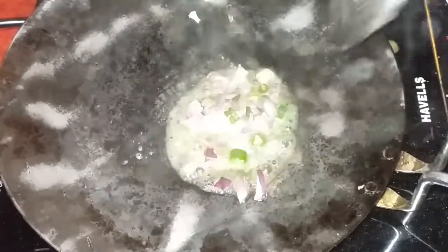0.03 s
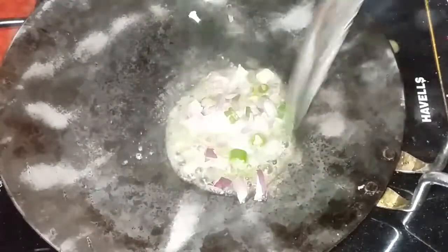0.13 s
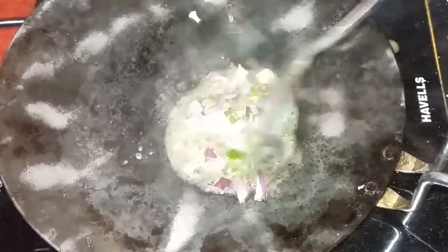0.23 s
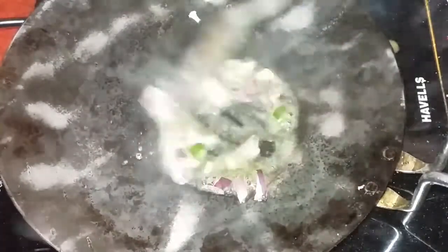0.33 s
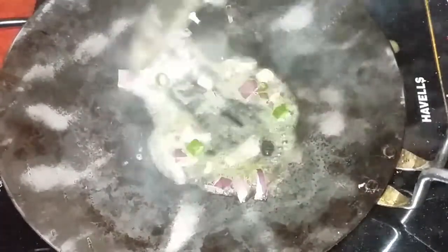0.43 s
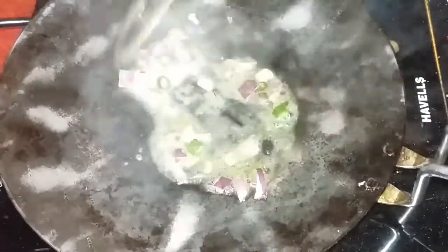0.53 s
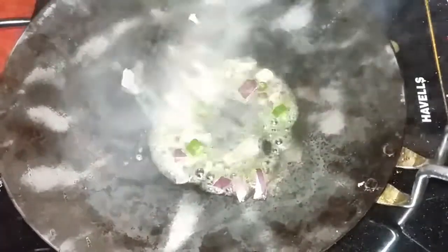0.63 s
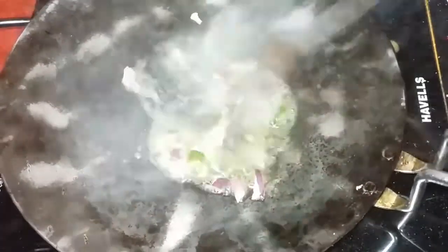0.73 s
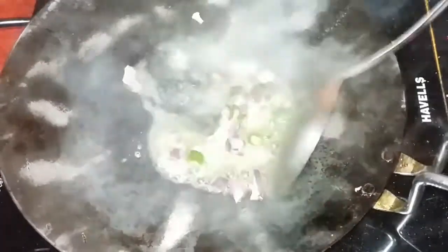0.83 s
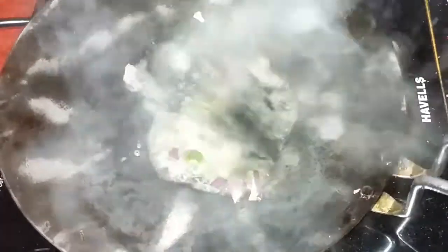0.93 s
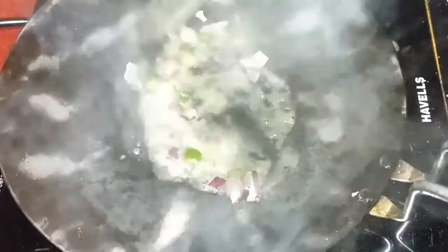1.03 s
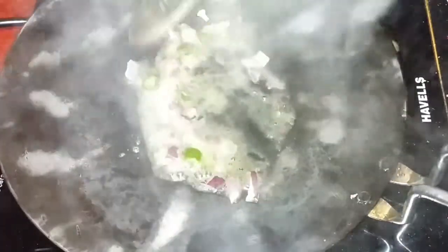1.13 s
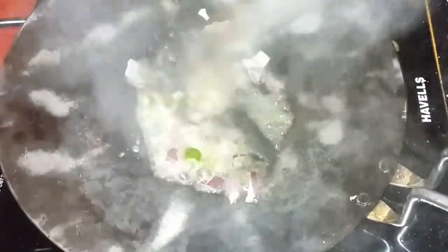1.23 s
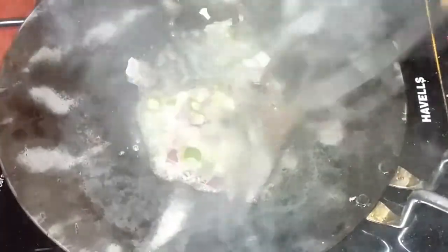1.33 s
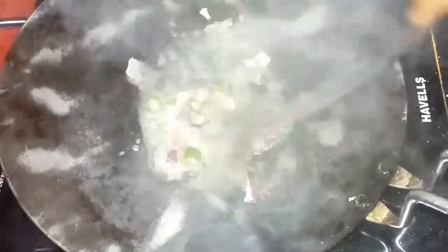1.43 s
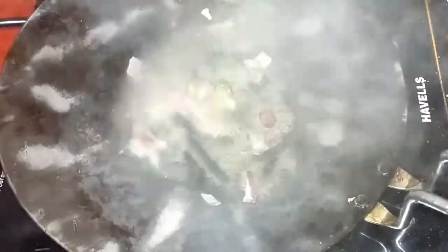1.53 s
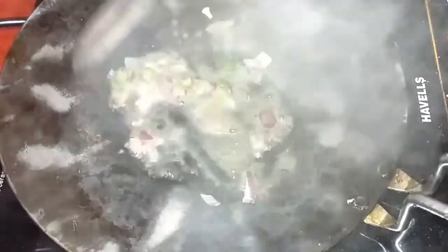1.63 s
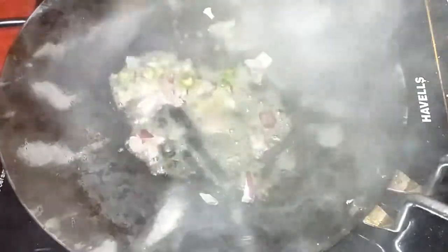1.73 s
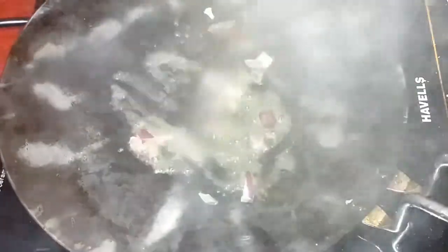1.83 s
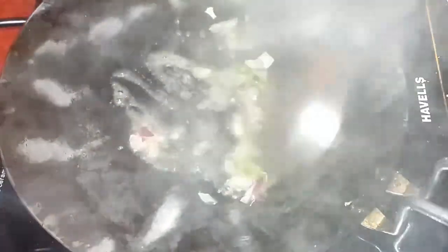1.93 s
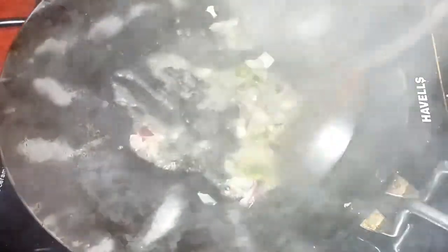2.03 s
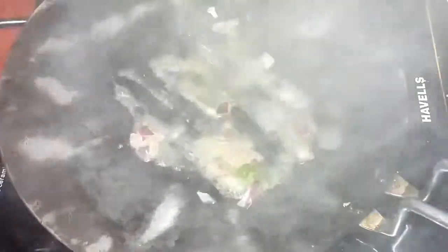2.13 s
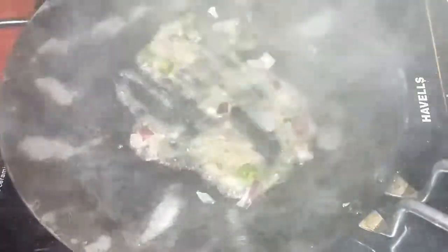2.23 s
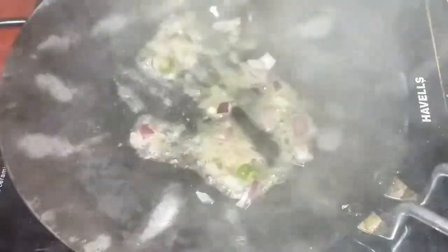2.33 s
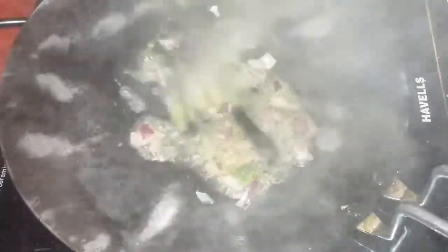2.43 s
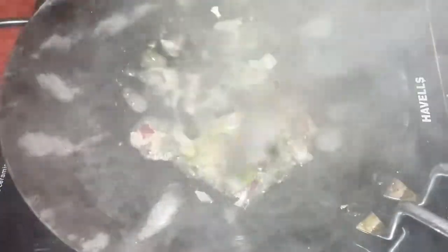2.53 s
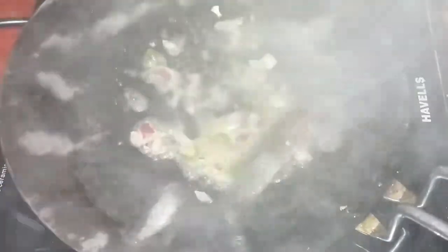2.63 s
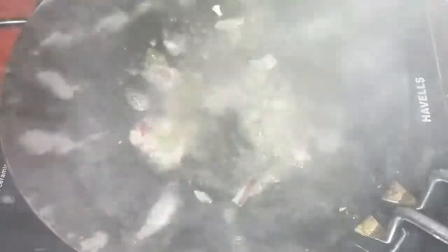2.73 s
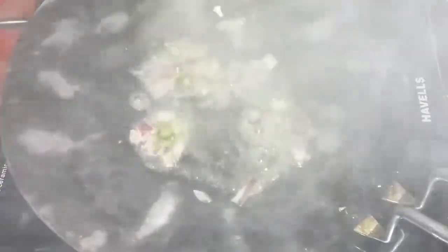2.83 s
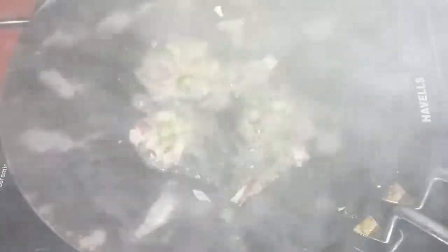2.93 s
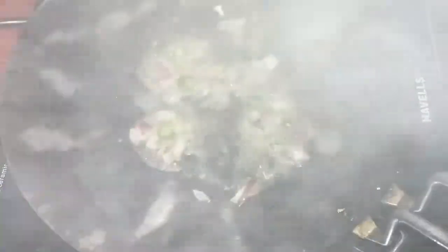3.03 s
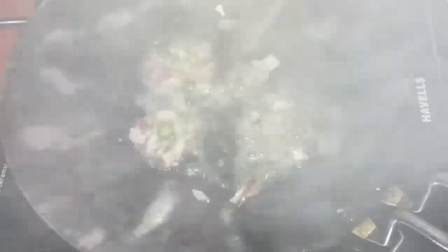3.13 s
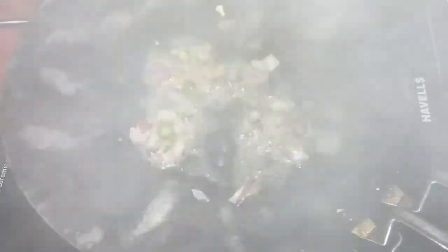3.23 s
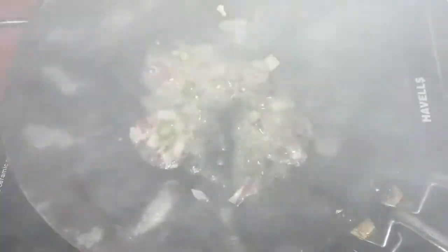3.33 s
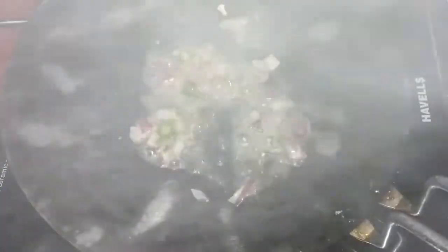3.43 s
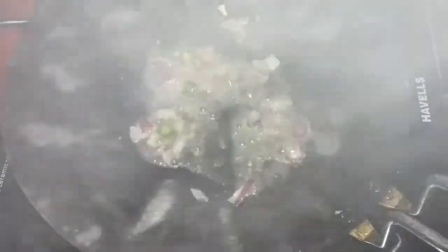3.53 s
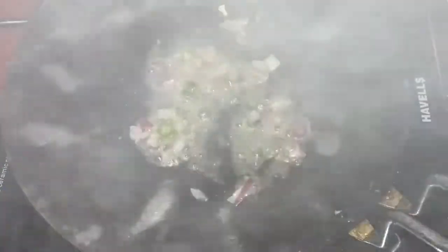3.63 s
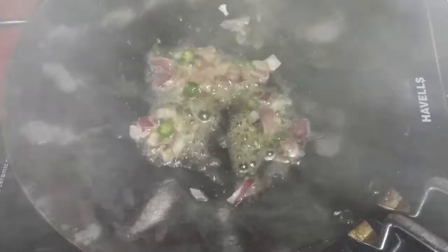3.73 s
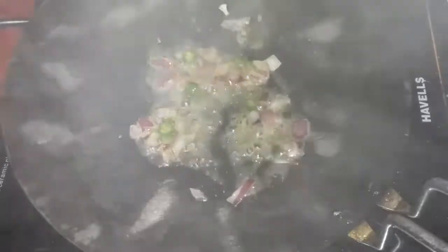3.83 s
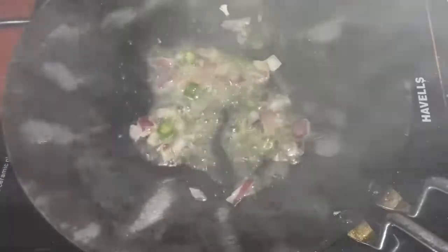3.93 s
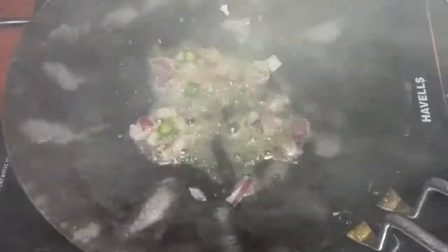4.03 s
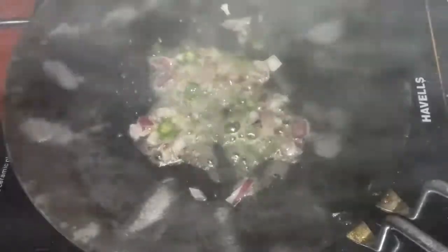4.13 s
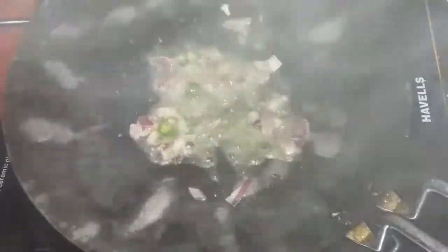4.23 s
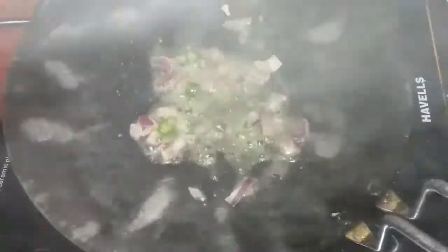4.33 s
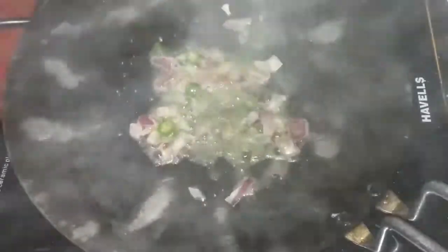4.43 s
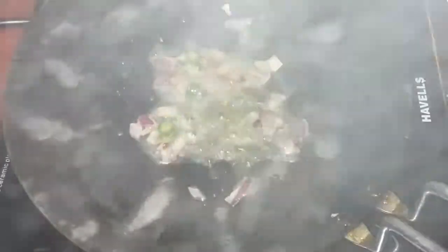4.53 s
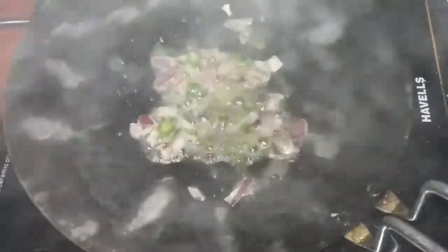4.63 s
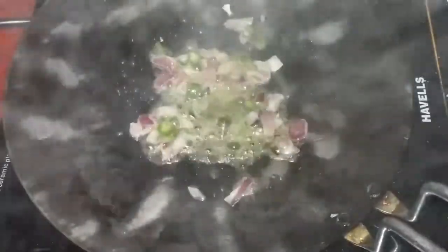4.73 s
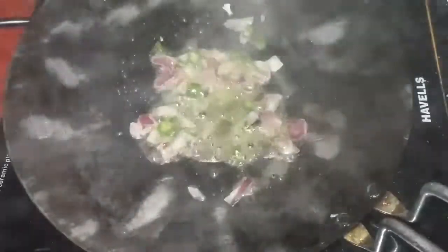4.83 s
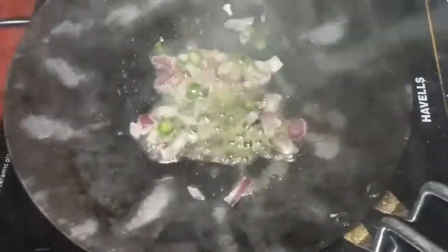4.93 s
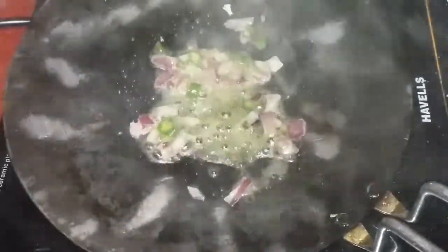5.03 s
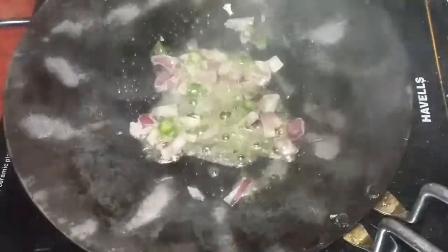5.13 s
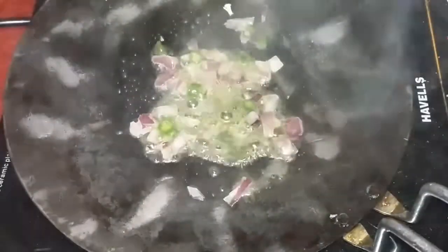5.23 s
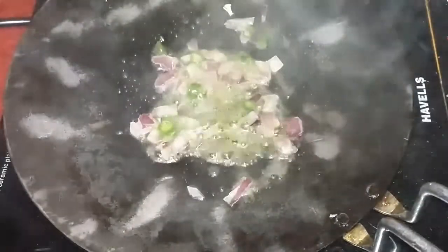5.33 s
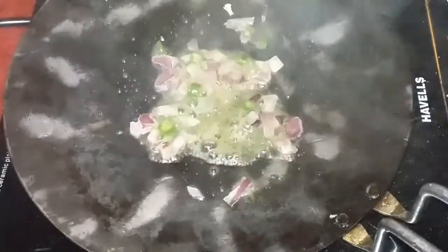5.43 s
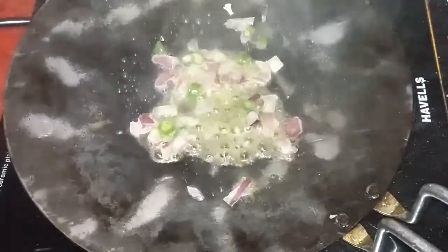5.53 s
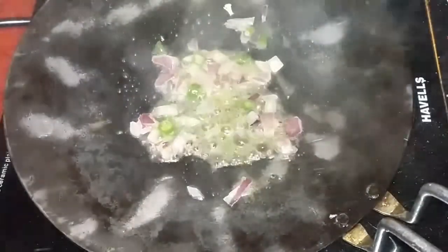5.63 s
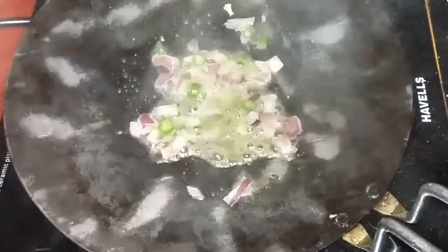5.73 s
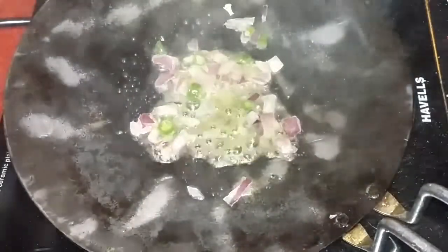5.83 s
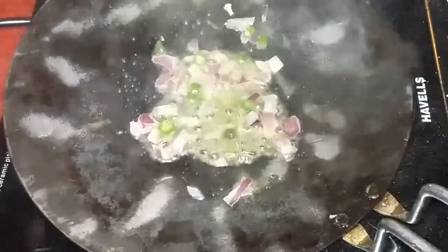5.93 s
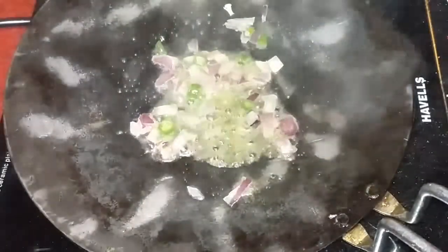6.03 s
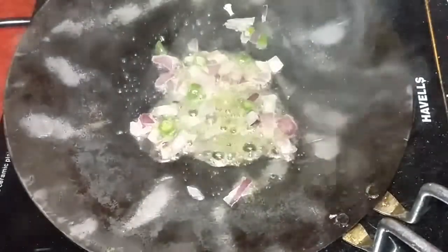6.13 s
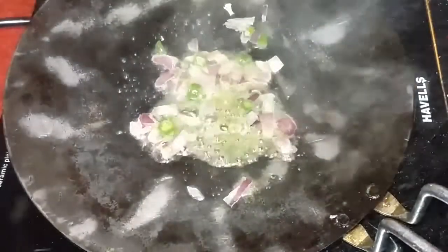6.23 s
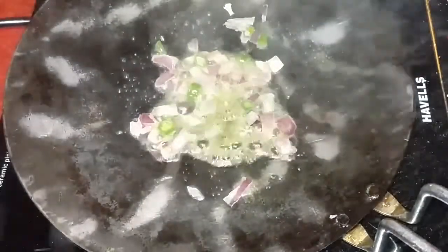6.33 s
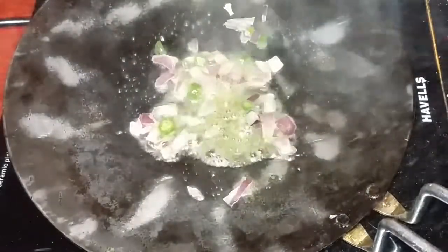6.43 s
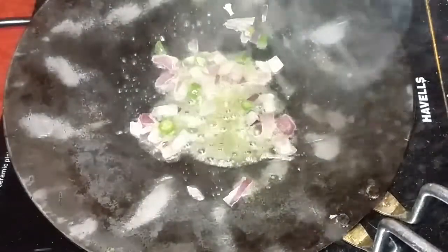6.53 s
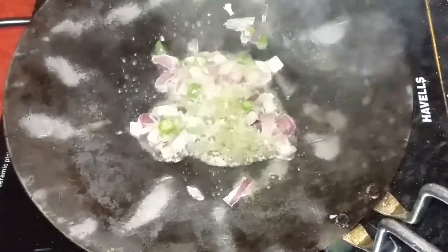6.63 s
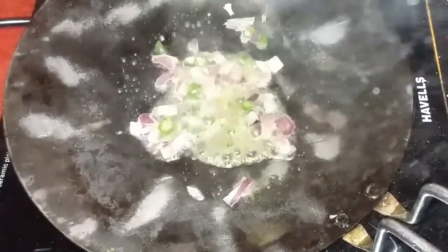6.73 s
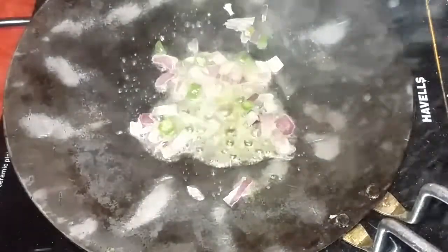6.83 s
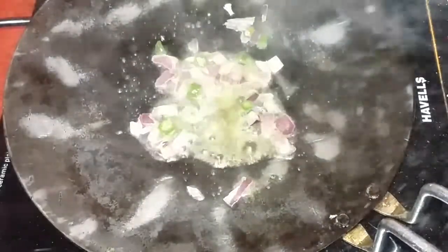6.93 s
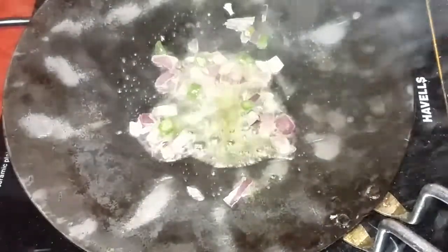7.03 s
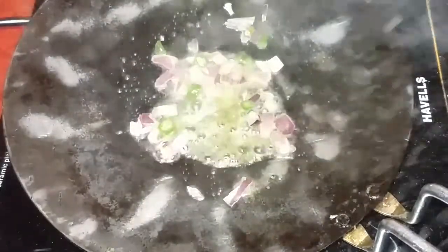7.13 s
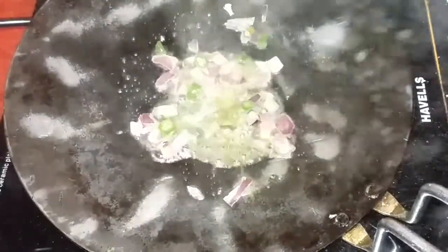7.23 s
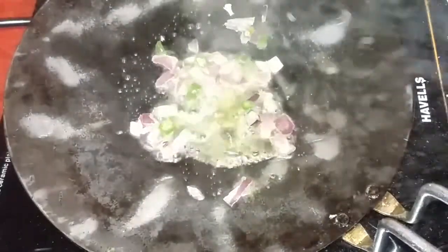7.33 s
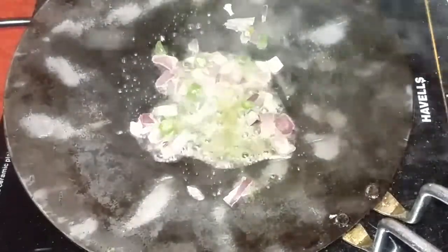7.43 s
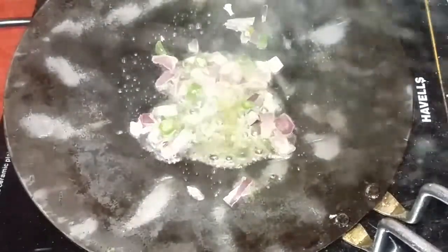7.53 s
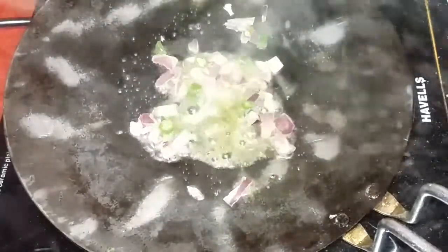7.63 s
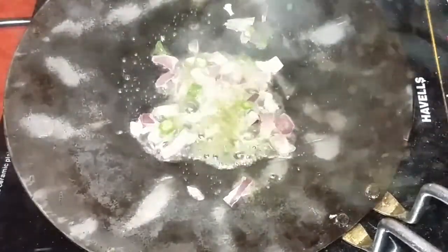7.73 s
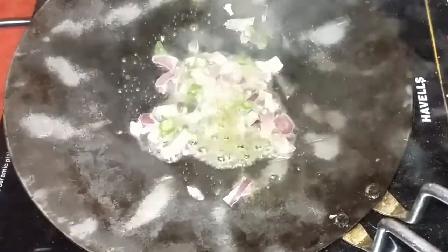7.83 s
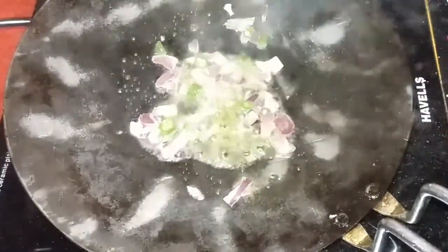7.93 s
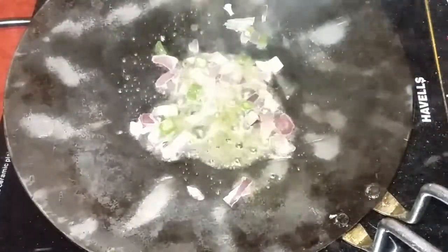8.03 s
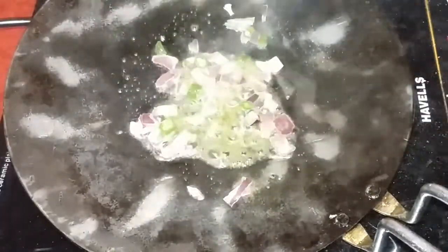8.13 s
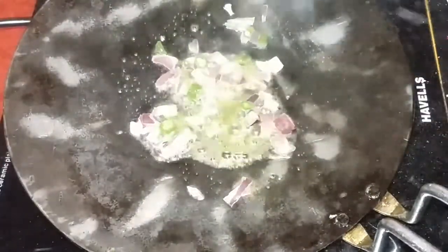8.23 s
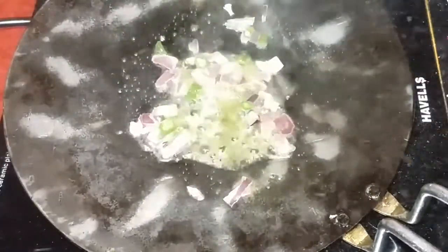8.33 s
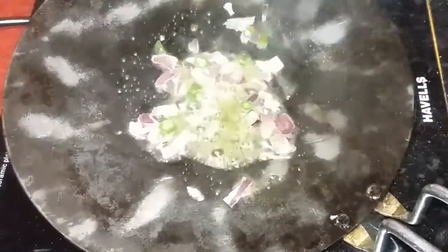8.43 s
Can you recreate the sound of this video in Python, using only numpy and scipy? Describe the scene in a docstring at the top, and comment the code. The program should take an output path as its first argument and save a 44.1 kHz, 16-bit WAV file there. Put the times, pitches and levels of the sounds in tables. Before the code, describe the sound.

Close, bright frying hiss flares under five sharp metal spoon clacks, dips briefly, then crackles and slowly calms over a faint fan hum.

```python
"""In a kitchen, chopped onion and chilli fry in butter on a flat iron pan; the induction hob's fan hums.
The sizzle is made of tiny random clicks, bubbles that ring, and a few snapping spits of fat.
A steel spoon knocks and drags over the pan five times, ringing both; the spread butter flares up.
The whole sound sinks for a second, then returns, and the sizzle slowly settles."""
import sys
import numpy as np
from scipy import signal
from scipy.fft import rfft, irfft, next_fast_len
from scipy.io import wavfile
from scipy.ndimage import uniform_filter1d, minimum_filter1d, map_coordinates

SR = 44100
rng = np.random.default_rng(int(sys.argv[2]) if len(sys.argv) > 2 else 0)


def master_out(mix):
    """Clip the mix to full scale and print it as 16-bit PCM to the path in sys.argv[1]."""
    frames = np.transpose(np.atleast_2d(mix))
    ceiling = np.clip(frames, -1, 1)
    pcm = np.round(ceiling * 32767).astype(np.int16)
    wavfile.write(sys.argv[1], SR, pcm)


N = 374850
TIME = np.arange(N) / SR   # seconds
CUTOFF_HZ = 15680          # hardly anything is heard above this

# The rush of air through the hob: f/Hz, relative level/dB
FAN_AIR_COLOUR = [(25, -35), (45, -23), (65, -16.5), (100, -8.5), (150, -9.5), (200, -5.5), (360, -1.5),
                  (425, 7), (490, 4), (600, 0.5), (1150, 0), (1500, -7), (2500, -21), (6000, -50)]
# Tones of the seven blades and the motor's poles: multiple of the turning rate, relative level/dB
FAN_TONES = [(7, -15.5), (8, -16.5), (12, -8), (14, -19.5), (16, -17), (20, -14), (21, -13), (28, -2.5)]
FAN_TURNS_HZ, FAN_DB = 39.37, -41

# Spoon strokes: t/s, spoon level/dB, pan level/dB, place (0 middle to 1 rim), clack level/dB,
# drag level/dB, drag length/s, drag fading time/s
SPOON_STROKES = [(0.585, -17.5, -25, 0.39, -15, -27.5, 0.1, 0.27),
                 (0.896, -27, -16, 0.95, -13, -30.5, 0.05, .15),
                 (1.1438, -16, -28, 0.65, -9, -29, 0.075, 0.076),
                 (1.4272, -24, -15, 0, -7.5, -32.5, 0.11, .08),
                 (1.7862, -13.5, -21.5, 0.23, -0.5, -22.5, 0.1, 0.061)]
# The spoon bowl; its evenly spaced strong tones beat into a short buzz:
# f/Hz, relative level/dB, time to fade by 60 dB/s
SPOON_TONES = [(2284, -2, .14), (2430, -11, .07), (2579, 0, .14), (2695, -3, .11), (2869, -2, .13),
               (3012, -12, .1), (3277, -10, .12), (3931, -11, .13), (4510, -11, .1), (4670, -12, .08),
               (5300, -17, .09), (5620, -17, .09), (6700, -17, .09)]
# The brief clack of the spoon held against the iron: f/Hz, relative level/dB, time to fade by 60 dB/s
CLACK_TONES = [(2740, 0, .022), (3350, -12, .012), (4600, -8, .022), (6400, -19, .012)]
# The iron pan: f/Hz, relative level when struck in the middle/dB, the same at the rim/dB,
# time to fade by 60 dB/s
PAN_TONES = [(415, -9, -22, .16), (560, -18, -30, .08), (730, -16, -28, .1), (1104, -7, -12, .17),
             (1472, -25, -2, .5), (1852, -11, 2, .14), (2305, -6, -2, .15), (2780, -3, -7, .09),
             (3350, -12, -13, .1), (3610, -13, -20, .1), (3935, -6, -6, .15), (4640, -11, -11, .11),
             (5523, -6, -19, .13), (6467, -7, -19, .12), (7740, -22, -22, .12)]
# The spoon's edge squeaks as its first drag ends, in the spoon's highest tones
SQUEAK_AT_S, SQUEAK_S, SQUEAK_DB, SQUEAK_ABOVE_HZ = 0.633, 0.048, -29.5, 4950

# The loudest spits of fat: t/s, level/dB, f/Hz, half width/octaves
LOUD_SPITS = [(.13, -28, 4400, 0.4), (3.27, -23, 3600, 0.47), (3.493, -20, 5000, 1.3),
              (3.514, -22, 5200, .15), (3.625, -19.5, 5150, 0.15), (3.706, -15, 7000, 1.7),
              (4.08, -20, 4200, .9), (4.254, -21, 3300, .6), (4.4563, -23.5, 4300, 0.16),
              (4.4735, -21, 12000, .6), (4.618, -23, 5040, .3), (4.873, -20, 3000, 1.2),
              (5.1204, -27, 6600, 0.28), (5.924, -28, 2960, .27), (5.9814, -26, 5140, 0.79),
              (6.218, -25, 6200, 0.19), (6.422, -24, 6740, .11), (6.702, -18, 9000, 1.4),
              (6.71, -21, 4200, 0.41), (7.553, -29, 3600, 0.56)]
# The spray fades more slowly when the pitch is clear; its fading time halves with each such step in width
SPRAY_S, HALVING_OCTAVES = 0.0035, 0.91
# Small spits come at random, with a level that follows the bubbling
SMALL_SPIT_OVER_DB, SMALL_SPIT_SPREAD_DB = 13.5, 2.5
SMALL_SPIT_LOW_HZ, SMALL_SPIT_HIGH_HZ = 2900, 8200
SMALL_SPIT_NARROW, SMALL_SPIT_WIDE = 0.12, 1.04   # half width in octaves

# How hard the butter fries: it leaps when the spoon spreads it, then settles as the water boils off:
# t/s, fizz level before flares/dB
SIMMER = [(0, -44.5), (.355, -40.5), (.445, -31), (2.7, -33), (4.1, -34.5), (5.4, -40.5), (8.5, -46.5)]
# The spoon pushes wet food onto bare hot iron and the sizzle flares: t/s, length of the push/s, rise in fizz
# level/dB, rise in bubbling and murmur level/dB
FLARES = [(.40, 0.23, 4, 6), (1.0, 0.24, 5.5, 6.5), (1.58, 0.13, 2, 3), (2.16, 0.25, 5.5, 1.5)]
FLARE_ATTACK_S, FLARE_RELEASE_S = 0.047, 0.073
# Bubbling and a ringing murmur: level at the usual fizz level, and their share of its simmer swing
USUAL_FIZZ_DB = -33.5
BUBBLING_DB, BUBBLING_FOLLOWS = -40, 0.66
MURMUR_DB, MURMUR_FOLLOWS = -47, 0.82
# Short damped tones under the sizzle: f/Hz, relative level/dB, time to fade by 60 dB/s
MURMUR_TONES = [(2286, 2.5, 0.03), (2545, 5, 0.016), (2710, -3, 0.024)]
# Colour of the bubbling: f/Hz, relative level/dB
BUBBLING_COLOUR = [(60, -30), (900, -4), (1700, -2), (2050, -0.5), (2400, -3), (3300, -2.5), (4000, -1.5),
                   (4700, 1.2), (5900, -3), (6900, -2.5), (8300, -14), (12000, -22)]
# Colour of the fizz: f/Hz, relative level/dB
FIZZ_COLOUR = [(60, -31), (1500, -23), (3500, -4), (6500, -2), (8600, -6), (10500, -2), (12300, -1.5),
               (14200, -3), (15700, -2.2)]

# A near surface mirrors the sizzle as the microphone moves: t/s, extra time on the way/ms
MIRROR_DELAY = [(4.75, 0.45), (5.0, 0.29), (5.4, 0.37), (6.7, .37), (7.15, 0.39), (7.42, 0.486),
                (7.7, 0.36), (8.2, .35)]
MIRROR_FROM_S, MIRROR_FADE_S, MIRROR_SHARE = 4.3, 0.5, 0.19
# The level of the whole sound falls, stays low and comes back, starting at the last knock
DIP_AT_S, DIP_FALL_S, DIP_HOLD_S, DIP_RETURN_S, DIP_DB = 1.785, 0.29, 0.79, 0.32, -7
# Colour difference of the two microphones: f/Hz, left minus right level/dB
MICROPHONE_BALANCE = [(2050, 0), (3400, -3.5), (4700, -8.5), (5800, -10), (7300, -5.5), (8400, 0.5),
                      (9800, 3.5), (12200, 3), (13500, 0.5)]


def from_db(db):
    """Turn decibels into a gain."""
    return 10 ** (np.asarray(db) / 20)


def rms_one(x):
    """Scale a sound to an average strength (rms) of one."""
    return x / np.sqrt(np.mean(x ** 2) + 1e-20)


def in_time(rows):
    """Join the points of a table into one curve over time for each column."""
    t, *columns = np.transpose(rows)
    return [np.interp(TIME, t, column) for column in columns]


def ramp(start_s, length_s):
    """Rise evenly from nothing to one, then stay."""
    return np.clip((TIME - start_s) / length_s, 0, 1)


def filtered(x, kind, edges_hz):
    """Keep only part of the pitch range, with gentle edges."""
    return signal.sosfilt(signal.butter(2, edges_hz, kind, fs=SR, output="sos"), x)


def colour(x, points):
    """Shape a sound by a smooth curve of level against frequency, without shifting it in time."""
    hz, db = np.transpose(points)
    size = next_fast_len(N + SR // 10)
    bins_hz = np.maximum(np.fft.rfftfreq(size, 1 / SR), 1)
    gain = from_db(np.interp(np.log(bins_hz), np.log(hz), db))
    return irfft(rfft(x, size) * gain, size)[:N]


def drift(rate):
    """Wander smoothly by chance, with a spread of one, at about this rate per second."""
    step = 40   # samples between the slow values
    r = np.exp(-2 * np.pi * rate * step / SR)
    noise = rng.standard_normal(N // step + 2002)
    slow = signal.lfilter([1], [1, -2 * r, r * r], noise)[2000:]
    return np.interp(np.arange(N) / step, np.arange(len(slow)), rms_one(slow))


def ring(clicks, hz, t60):
    """Each click sets off a fading tone, of height one for a unit click; a small body gives no bass."""
    r = np.exp(-np.log(1000) / (t60 * SR))
    w = 2 * np.pi * min(hz, SR / 2) / SR
    return signal.lfilter([1, -1], [1, -2 * r * np.cos(w), r * r], clicks + 1e-18)


def bursts(per_s, spread_db, largest):
    """Scatter clicks at random times, most of them small and a few large."""
    sizes = from_db(spread_db * np.minimum(rng.exponential(1, N), largest))
    signs = rng.choice([-1, 1], N)
    return sizes * signs * (rng.random(N) < per_s / SR)


def fan(level_db, speed_wander=0.000884, waver_db=0.5):
    """Air rushes through the hob's vents, with tones locked to the turning of the fan."""
    turns = np.cumsum(FAN_TURNS_HZ * (1 + speed_wander * drift(1.54))) / SR
    tones = np.zeros(N)
    for multiple, db in FAN_TONES:
        phase = 2 * np.pi * (round(multiple) * turns + rng.random())
        tones += from_db(db + waver_db * drift(7.5)) * np.sin(phase)
    air = rms_one(colour(rng.standard_normal(N), FAN_AIR_COLOUR))
    # the root of two gives a sine an rms of one
    return from_db(level_db) * (air + np.sqrt(2) * from_db(-1) * tones)


def kitchen(x, t60=0.13, early_s=0.0032):
    """Worktop and walls answer with a short, blurred echo, made by spreading the sound over fading noise."""
    age = TIME[:SR // 2]
    fade = np.exp(-np.log(1000) * age / t60)
    tail = rng.standard_normal(len(age)) * fade * (age > early_s)
    return signal.fftconvolve(x, tail / np.sqrt(np.sum(tail ** 2)))[:N]


def squeak():
    """Steel slips quickly over bare iron and sets the spoon's highest tones singing."""
    slips = rng.standard_normal(N) * np.sin(np.pi * ramp(SQUEAK_AT_S, SQUEAK_S)) ** 2
    sound = sum(from_db(db) * ring(slips, hz, t60 / 2)
                for hz, db, t60 in SPOON_TONES if hz > SQUEAK_ABOVE_HZ)
    return from_db(SQUEAK_DB) * sound / np.sqrt(np.sum(sound ** 2) / (SQUEAK_S * SR))


def spoon_on_pan(slips_per_s=600, pressed_damping=2.45, thud_db=-7, thud_s=0.059, travel_s=0.004):
    """Each stroke lands, so that spoon and pan ring, then drags over the iron in tiny slips."""
    out, age = np.zeros(N), TIME[:SR]
    landing = (age == 0) * 1.0
    for t, spoon_db, pan_db, place, clack_db, drag_db, drag_s, drag_fade_s in SPOON_STROKES:
        slips = rng.choice([-1, 1], len(age)) * (rng.random(len(age)) < slips_per_s / SR)
        push = np.sqrt(np.sin(np.pi * np.minimum(age / drag_s, 1)))
        drag = from_db(drag_db) * slips * np.exp(-age / drag_fade_s) * push
        sound = np.zeros(len(age))
        for hz, db, t60 in SPOON_TONES:
            knock = from_db(spoon_db) * ring(landing, hz, t60)
            # pressed onto the iron, the spoon rings shorter
            scrape = ring(drag, hz, t60 / pressed_damping)
            sound += from_db(db) * (knock + scrape)
        for hz, db, t60 in CLACK_TONES:
            sound += from_db(clack_db + db) * ring(landing, hz, t60)
        # butter cushions the first instant of the contact
        sound *= 1 - np.exp(-age / 0.0004)
        for hz, middle_db, rim_db, t60 in PAN_TONES:
            # bending waves need a moment to spread over the plate
            arrival = np.roll(landing, int(rng.random() * travel_s * SR))
            tone_db = middle_db + place * (rim_db - middle_db)
            sound += from_db(pan_db + tone_db) * ring(arrival, hz, t60)
        # many short tones of pan and hob blur into a thud, weaker at the rim
        thud = rng.standard_normal(len(age)) * np.exp(-age / thud_s) * (1 - 0.6 * place)
        sound += from_db(pan_db + thud_db) * filtered(thud, "band", [350, 4200])
        at = round(t * SR)
        out[at:at + len(age)] += sound
    return filtered(out, "high", 250)


def small_spits(bubbling_db, count=120):
    """Scatter small spits by chance, from clear pips to broad ticks, in rows like those of LOUD_SPITS."""
    when, size, pitch, width = rng.random((count, 4)).T
    at = (when * N).astype(int)
    level_db = bubbling_db[at] + SMALL_SPIT_OVER_DB + SMALL_SPIT_SPREAD_DB * (2 * size - 1)
    hz = SMALL_SPIT_LOW_HZ * (SMALL_SPIT_HIGH_HZ / SMALL_SPIT_LOW_HZ) ** pitch
    octaves = SMALL_SPIT_NARROW * (SMALL_SPIT_WIDE / SMALL_SPIT_NARROW) ** width
    return list(zip(TIME[at], level_db, hz, octaves))


def spits(rows, spray_db=-6, snap_db=-1):
    """A trapped drop bursts with a snap and a short spray: a click and fading noise around one pitch."""
    out, age = np.zeros(N), TIME[:SR // 20]
    for t, level_db, hz, octaves in rows:
        spray_s = SPRAY_S / 2 ** (octaves / HALVING_OCTAVES)
        edges_hz = [hz / 2 ** octaves, min(hz * 2 ** octaves, CUTOFF_HZ)]
        snap = filtered((age == 0) * 1.0, "band", edges_hz)
        spray = filtered(rng.standard_normal(len(age)), "band", edges_hz)
        puff = from_db(snap_db) * snap / np.abs(snap).max()
        puff += from_db(spray_db) * rms_one(spray) * np.exp(-age / spray_s)
        at = round(t * SR)
        out[at:at + len(age)] += (from_db(level_db) * puff)[:N - at]
    return out


def frying_levels():
    """Fizz, bubbling and murmur levels in dB follow the simmer, and flare while the spoon pushes the food."""
    fizz_db, = in_time(SIMMER)
    swing_db = fizz_db - USUAL_FIZZ_DB
    coarse_db = 0
    for t, push_s, fizz_rise_db, coarse_rise_db in FLARES:
        release = np.exp(-np.maximum(TIME - t - push_s, 0) / FLARE_RELEASE_S)
        flare = ramp(t, FLARE_ATTACK_S) * release
        fizz_db = fizz_db + fizz_rise_db * flare
        coarse_db = coarse_db + coarse_rise_db * flare
    bubbling_db = BUBBLING_DB + BUBBLING_FOLLOWS * swing_db + coarse_db
    murmur_db = MURMUR_DB + MURMUR_FOLLOWS * swing_db + coarse_db
    return fizz_db, bubbling_db, murmur_db


def ringing_murmur(level_db):
    """Bubbling taps set off short, damped tones near 2.3-2.7 kHz that colour the sizzle."""
    taps = bursts(per_s=3000, spread_db=2.5, largest=8.5)
    rings = sum(from_db(db) * ring(taps, hz, t60) for hz, db, t60 in MURMUR_TONES)
    return from_db(level_db) * rms_one(filtered(rings, "band", [1900, 3300]))


def bubbling(level_db, cycles=25, wash_share=1.45, flutter_db=0.8):
    """Larger bubbles in the butter each ring for some cycles at one of many pitches."""
    pops = bursts(per_s=1200, spread_db=2.5, largest=5.0)
    pitches_hz = np.geomspace(1700, 8000, num=28)
    dealt = rng.integers(0, len(pitches_hz), N)   # which pitch a pop gets
    rings = sum(ring(pops * (dealt == k), hz, cycles / hz) * hz for k, hz in enumerate(pitches_hz))
    froth = rms_one(rings) + wash_share * rng.standard_normal(N)
    return from_db(level_db + flutter_db * drift(8.1)) * rms_one(colour(froth, BUBBLING_COLOUR))


def fizz(level_db, hiss_share=0.76, crack_share=0.28, flutter_db=1.0):
    """Countless tiny steam bubbles snap on the iron; the smallest merge to a hiss, a few crack sharply."""
    snaps = rms_one(bursts(per_s=7000, spread_db=3.0, largest=7.4))
    snaps += hiss_share * rng.standard_normal(N)
    snaps += crack_share * rms_one(bursts(per_s=80, spread_db=3.5, largest=3))
    return from_db(level_db + flutter_db * drift(18)) * rms_one(colour(snaps, FIZZ_COLOUR))


def mirrored(x):
    """A reflection on a changing path, added to the sound, sweeps soft notches through the hiss."""
    delay_ms, = in_time(MIRROR_DELAY)
    late = map_coordinates(x, [(TIME - delay_ms / 1000) * SR], order=3)
    return x + MIRROR_SHARE * ramp(MIRROR_FROM_S, MIRROR_FADE_S) * late


def dip():
    """The gain of the whole sound sinks, stays low and returns."""
    fall = ramp(DIP_AT_S, DIP_FALL_S)
    rise = ramp(DIP_AT_S + DIP_FALL_S + DIP_HOLD_S, DIP_RETURN_S)
    return from_db(DIP_DB * (fall - rise))


def scene():
    """Everything reaches two close microphones in step, each with its own colour."""
    fizz_db, bubbling_db, murmur_db = frying_levels()
    knocks = spoon_on_pan() + squeak() + spits(list(LOUD_SPITS) + small_spits(bubbling_db))
    echo = from_db(-16.5) * kitchen(knocks)
    frying = fizz(fizz_db) + bubbling(bubbling_db) + ringing_murmur(murmur_db)
    sound = dip() * (fan(FAN_DB) + echo + knocks + mirrored(frying))
    # left and right share out the sound so that their average is the sound itself
    left_colour = [(hz, 20 * np.log10(2 / (1 + from_db(-db)))) for hz, db in MICROPHONE_BALANCE]
    left = colour(sound, left_colour)
    return np.array([left, 2 * sound - left])


def limiter(x, ceiling=0.94, release_db_per_s=90):
    """The gain ducks just ahead of a peak that would overload, then recovers."""
    over_db = 20 * np.log10(np.maximum(np.abs(x).max(axis=0) / ceiling, 1))
    recovery_db = release_db_per_s * TIME
    held_db = np.maximum.accumulate(over_db + recovery_db) - recovery_db
    return x * uniform_filter1d(minimum_filter1d(from_db(-held_db), size=301), size=301)


def record(dry):
    """Limit the peaks, then cut the top steeply."""
    top_cut = signal.ellip(12, 0.1, 90, CUTOFF_HZ, fs=SR, output="sos")
    return signal.sosfilt(top_cut, limiter(dry))


dry = scene()
out = record(dry)
master_out(out)
```